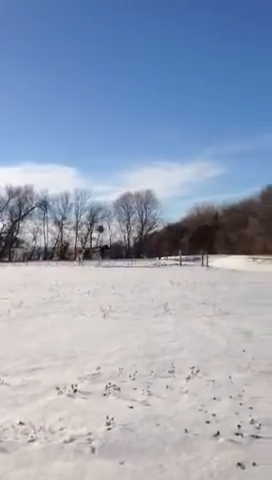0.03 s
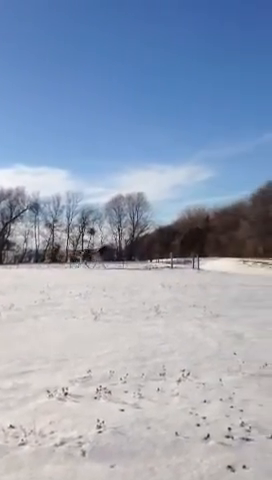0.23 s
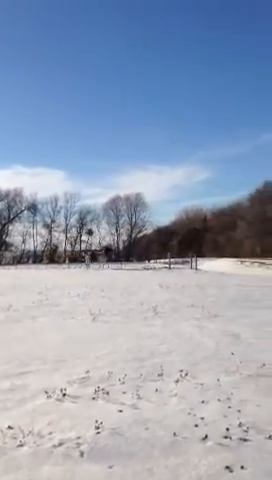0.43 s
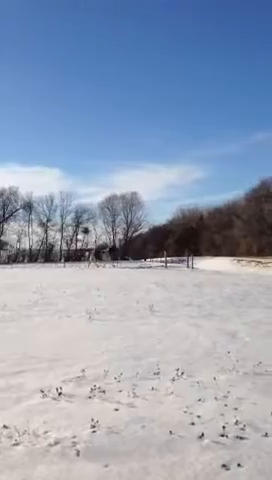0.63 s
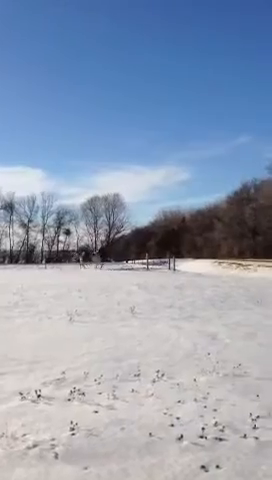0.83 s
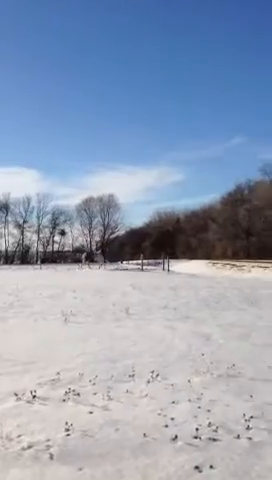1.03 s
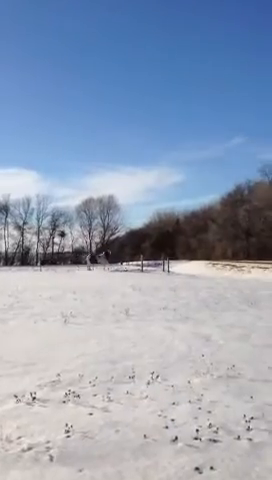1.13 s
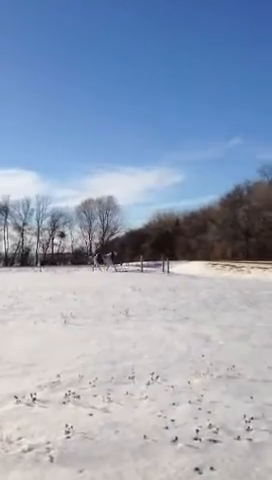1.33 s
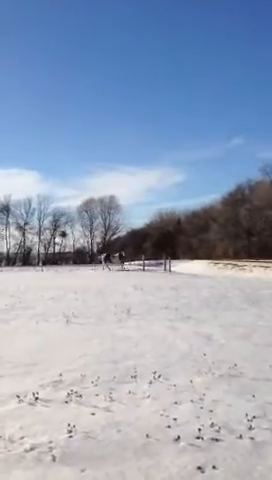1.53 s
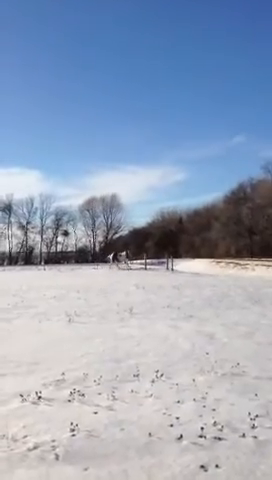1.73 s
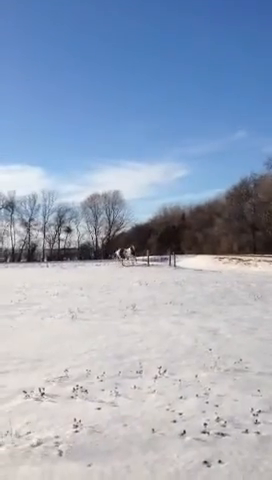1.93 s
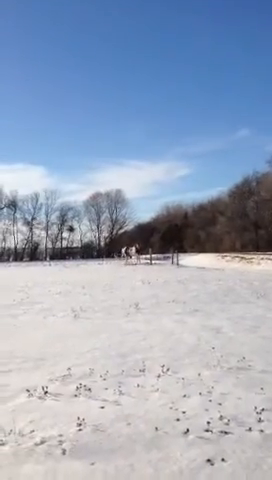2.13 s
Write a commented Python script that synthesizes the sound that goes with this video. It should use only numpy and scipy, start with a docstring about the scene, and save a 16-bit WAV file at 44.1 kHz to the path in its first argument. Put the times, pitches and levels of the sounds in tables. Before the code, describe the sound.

Single shrill horse whinny outdoors, held high then wobbling and dying away in a loose rattle

```python
"""Horse whinny over snow

A horse whinnies once: a low tone, and a high squeal that the low tone modulates into sidebands.
After a brief opening rattle the squeal holds, dips twice, wavers and breaks into a fading rattle.
Harmonic sums make both tones; shaped noise makes rush, rasp, breaks, flaps and air.
Trees return a faint echo through decaying random taps; a thud and a crunch of snow close the scene.
"""
import sys
import numpy as np
from scipy import signal
from scipy.fft import rfft, irfft
from scipy.io import wavfile

SR = 44100
rng = np.random.default_rng(int(sys.argv[2]) if len(sys.argv) > 2 else 0)


def pcm_store(signal):
    """Save signal as 16-bit PCM."""
    levels = np.round(np.clip(np.atleast_2d(signal), -1, 1) * 32767)
    wavfile.write(sys.argv[1], SR, levels.astype(np.int16).T)


N = 97020
T = np.arange(N) / SR
HZ = np.fft.rfftfreq(N, 1 / SR)


def amp(db):
    """Decibels to gain."""
    return 10 ** (np.asarray(db) / 20)


def unit(x):
    """Scales to rms 1."""
    return x / np.sqrt(np.mean(x ** 2) + 1e-20)


def curve(rows, axis=1):
    """One column of a timed table, interpolated at every sample and held beyond its ends."""
    rows = np.array(rows)
    return np.interp(T, rows[:, 0], rows[:, axis])


def level(rows, axis=1):
    """Gain from a dB curve, dying away exponentially outside it."""
    decay_s = 0.0088
    outside_s = np.maximum(rows[0][0] - T, 0) + np.maximum(T - rows[-1][0], 0)
    return amp(curve(rows, axis)) * np.exp(-outside_s / decay_s)


def colour(x, points):
    """Minimum-phase filter through (Hz, dB) points: causal, so clicks ring after they land."""
    hz, db = np.transpose(points)
    bin_hz = abs(np.fft.fftfreq(N, 1 / SR)) + 1
    log_gain = np.log(amp(np.interp(np.log(bin_hz), np.log(hz), db)))
    response = np.exp(signal.hilbert(log_gain).conj())[:len(HZ)]
    return irfft(rfft(x) * response, N)


def wander(rate_hz):
    """Smooth random curve of rms 1: noise under a Gaussian lowpass."""
    return unit(irfft(rfft(rng.standard_normal(N)) * np.exp(-(HZ / rate_hz) ** 2), N))


def phase(hz):
    """Running phase of a pitch curve [rad]."""
    return 2 * np.pi * np.cumsum(hz) / SR


def random_phase():
    """Random starting phase [rad]."""
    return 2 * np.pi * rng.random()


# pitch of the squeal and of the low voice: (time [s], pitch [Hz])
SQUEAL_PITCH_HZ = [(.2, 1490), (.22, 1630), (.284, 1783), (.34, 1858), (.455, 1890), (.482, 1712),
                   (.51, 1696), (.524, 1877), (.66, 1897), (.82, 1800), (.836, 1678), (.89, 1648),
                   (.934, 1700), (.948, 1820), (.975, 1790), (.99, 1715), (1.035, 1717), (1.06, 1821),
                   (1.11, 1739), (1.146, 1785), (1.22, 1557), (1.272, 1667), (1.3, 1613), (1.365, 1660),
                   (1.41, 1560)]
LOW_PITCH_HZ = [(.24, 401.3), (.274, 476.4), (.345, 511.2), (.48, 540), (.664, 504.4), (.73, 519.8),
                (.95, 509.4), (1.09, 443.6), (1.205, 421.2), (1.262, 481.4), (1.31, 420)]
# squeal's unsteadiness: (time [s], rms deviation [share of pitch])
JITTER_SHARE = [(.2, 0.035), (.33, 0.0039), (.66, 0.0051), (.8, 0.004), (1.29, .011), (1.36, 0.049)]
SQUEAL_JITTER_HZ, LOW_JITTER_HZ = 236, 95.5
LOW_JITTER_RATIO = 1.618  # low voice's unsteadiness relative to the squeal's


def voice_phases():
    """Phases of the two voices, each pitch unsteady by its own random wander."""
    jitter = curve(JITTER_SHARE)
    low_jitter = LOW_JITTER_RATIO * jitter * wander(LOW_JITTER_HZ)
    high_jitter = jitter * wander(SQUEAL_JITTER_HZ)
    low = phase(curve(LOW_PITCH_HZ) * (1 + low_jitter))
    high = phase(curve(SQUEAL_PITCH_HZ) * (1 + high_jitter))
    return low, high


# squeal's fundamental, then its overtones: (time [s], level [dB])
SQUEAL_LEVEL_DB = [(.205, -42), (.28, -34), (.46, -35), (.545, -33.5), (.66, -37.5), (.87, -37),
                   (1.01, -32.5), (1.1, -34.5), (1.175, -29), (1.215, -32.5), (1.275, -27.5),
                   (1.302, -32.5), (1.32, -48), (1.383, -30.5), (1.41, -40.5)]
OVERTONE_LEVEL_DB = [(.2, -64), (.25, -44.5), (.36, -44), (.54, -37.5), (.72, -39), (.8, -34.5),
                     (.975, -34.5), (1.0, -45), (1.065, -39.5), (1.1, -58.5), (1.27, -42.5)]
# depth of the sidebands round the fundamental: (time [s], level [dB])
COUPLING_DB = [(.2, -18), (.29, -3), (.45, -5), (.66, -3), (.78, -5.5), (.95, -12.5), (1.02, -9.5),
               (1.08, -29), (1.3, -19), (1.4, -16)]
# one row per squeal harmonic: relative level [dB] at offsets of -3 .. +3 times the low pitch
SIDEBANDS_DB = [(-43, -57, -19.5, 2.5, 0, -4, -4), (-15, -10, -15, 2.5, -3, -16.5, -16),
                (-7.5, -17, -35, -14, -17, -38, -25)]
FLICKER_DB, FLICKER_HZ = 3.5, 32.5  # rms, sidebands; halved elsewhere
OVERTONE_COUPLING_POWER = 0.23


def squeal(low, high):
    """The high tone; each harmonic carries flickering sidebands spaced by the low pitch."""
    first, upper = level(SQUEAL_LEVEL_DB), level(OVERTONE_LEVEL_DB)
    depth = amp(curve(COUPLING_DB))
    out = np.zeros(N)
    for m, row in enumerate(SIDEBANDS_DB, 1):
        carrier = first if m == 1 else upper
        sideband = carrier * (depth if m == 1 else depth ** OVERTONE_COUPLING_POWER)
        for k, db in enumerate(row, -3):
            gain = sideband if k else carrier
            flicker_db = FLICKER_DB * wander(FLICKER_HZ) * (1 if k else .5)
            out += gain * amp(db + flicker_db) * np.cos(m * high + k * low + random_phase())
    return np.sqrt(2) * out


# low voice: (time [s], level [dB])
LOW_LEVEL_DB = [(.19, -68), (.27, -48), (.87, -51.5), (1.1, -45), (1.28, -48.5), (1.32, -64)]
# relative level of each harmonic from the first up [dB]
LOW_HARMONICS_DB = [2.5, 4, -17.5, -2, -64, 2, 1.5]
# extra on all harmonics above the first, then on the third alone: (time [s], level [dB])
LOW_BRIGHT_DB = [(.27, -9.5), (.4, 2.5), (.85, 2.5), (1.08, -11), (1.3, 0)]
THIRD_SWELL_DB = [(1.0, 12), (1.18, 28), (1.25, 10.5)]


def low_voice(low):
    """The lower tone: a harmonic sum whose partials flicker independently."""
    bright = amp(curve(LOW_BRIGHT_DB))
    tone = np.zeros(N)
    for k, db in enumerate(LOW_HARMONICS_DB, 1):
        gain = bright if k > 1 else 1
        if k == 3:
            gain = gain * amp(curve(THIRD_SWELL_DB))
        flicker_db = FLICKER_DB / 2 * wander(FLICKER_HZ)
        tone += gain * amp(db + flicker_db) * np.cos(k * low)
    return np.sqrt(2) * level(LOW_LEVEL_DB) * tone


# colour of both tones: (frequency [Hz], gain [dB])
THROAT_DB = [(3600, -4), (5000, -3), (5450, -16.5), (12000, -13)]


def throat(tones):
    """Filters the two tones by the throat's response."""
    return colour(tones, THROAT_DB)


# harsh patches: (start [s], end [s], centre [Hz], level [dB])
BREAKS = [(0.254, 0.315, 3494, -45), (0.473, 0.528, 4200, -46.5), (0.821, 0.943, 4410, -49),
          (0.988, 1.04, 4380, -40.5), (1.063, 1.107, 6400, -57)]
BREAK_WIDTH_HZ = 400


def breaks(low):
    """The squeal cracks into a harsh noise band, chopped by each cycle of the low voice."""
    out = np.zeros(N)
    for start_s, end_s, centre_hz, db in BREAKS:
        band = wander(BREAK_WIDTH_HZ) * np.cos(2 * np.pi * centre_hz * T)
        chopped = unit(band * (1 + np.cos(low)))
        out += level([(start_s, db), (end_s, db)]) * chopped
    return out


# treble rasp: (time [s], level [dB])
RASP_LEVEL_DB = [(.19, -63.5), (.27, -50), (.55, -47), (.9, -45.5), (1.085, -46.5), (1.3, -53)]
# its colour: (frequency [Hz], relative density [dB per Hz])
RASP_COLOUR_DB = [(2300, -26), (3400, 5.5), (4350, 2.5), (5200, -11.5), (7100, -14), (8500, -17),
                  (12000, -32.5)]
RASP_WIDTH_HZ = 28


def rasp(low, high):
    """Fluttering combination tones of the two voices, giving way to hiss at the top."""
    clash = np.zeros(N)
    for m in range(1, 6):
        for k in range(-3, 4):
            clash += wander(RASP_WIDTH_HZ) * np.cos(m * high + k * low + random_phase())
    hiss = np.diff(np.diff(rng.standard_normal(N + 2)))  # differenced twice: rises with frequency
    return level(RASP_LEVEL_DB) * unit(colour(unit(clash) + hiss, RASP_COLOUR_DB))


# air through the voice: (time [s], level [dB])
RUSH_LEVEL_DB = [(.2, -49.5), (.28, -43), (.4, -52), (.66, -43.5), (.85, -58.5), (1.05, -45.5), (1.18, -41),
                 (1.31, -47)]
# its colour: (frequency [Hz], relative density [dB per Hz])
RUSH_COLOUR_DB = [(100, -40.5), (1200, -4.5), (1800, 12), (2400, 2.5), (8000, -76)]
RUSH_PULSING = 0.17  # modulation depth


def rush(low):
    """Air noise, puffing with each cycle of the low voice."""
    puffs = (1 + RUSH_PULSING * np.cos(low)) * rng.standard_normal(N)
    return level(RUSH_LEVEL_DB) * unit(colour(puffs, RUSH_COLOUR_DB))


# opening and closing rattles: (time [s], chest level [dB], mouth level [dB], nostril level [dB])
RATTLES_DB = [
    [(.147, -59.5, -61.5, -71), (.19, -54, -49.5, -51), (.24, -59, -52, -52)],
    [(1.305, -53.5, -41.5, -48), (1.41, -49.5, -45, -48.5), (1.51, -54.5, -45, -54.5),
     (1.55, -52.5, -49.5, -54), (1.63, -51, -53, -62), (1.66, -55, -56, -54), (1.695, -61, -55.5, -57)],
]
# flapping speed: (time [s], rate [flaps per s])
FLAP_RATE_HZ = [(1.5, 161), (1.54, 98), (1.64, 93), (1.7, 63)]
# brief spurts of mouth and nostrils: (time [s], extra level [dB])
SPURTS_DB = [(1.481, 4), (1.648, 5.5)]
# cavities: (frequency [Hz], relative density [dB per Hz])
CHEST_DB = [(80, -26), (400, -2.5), (560, -0.5), (1400, -33)]
MOUTH_DB = [(200, -43), (950, -2), (1700, 1), (2400, -5.5), (4000, -43)]
NOSTRILS_DB = [(1700, -34), (3300, 5.5), (5300, -18.5), (14000, -36)]
FLAP_DECAY_CYCLES, FLAP_FLOOR, FLAP_CLICK = .33, .3, .2  # puff decay, steady air, click share
FLAP_WANDER, FLAP_WANDER_HZ = .15, 90  # rms of log rate, and its speed
FLAP_SPREAD_DB, SPURT_S = 1.5, .003


def rattle():
    """Slack, uneven flaps: each a click and a decaying puff, sounding chest, mouth and nostrils."""
    rate_hz = curve(FLAP_RATE_HZ) * np.exp(FLAP_WANDER * wander(FLAP_WANDER_HZ))
    turns = np.cumsum(rate_hz) / SR
    clicks = unit(np.diff(np.floor(turns), prepend=0))
    puff_shape = FLAP_FLOOR + np.exp(-(turns % 1) / FLAP_DECAY_CYCLES)
    spurts = amp(sum(db * np.exp(-((T - at_s) / SPURT_S) ** 2) for at_s, db in SPURTS_DB))
    cavities = [(CHEST_DB, 1), (MOUTH_DB, spurts), (NOSTRILS_DB, spurts)]
    out = np.zeros(N)
    for column, (cavity, push) in enumerate(cavities, 1):
        size = amp(FLAP_SPREAD_DB * rng.standard_normal(N))[turns.astype(int)]  # one draw per flap
        puffs = unit(puff_shape * rng.standard_normal(N))
        effort = push * sum(level(rows, axis=column) for rows in RATTLES_DB)
        out += effort * unit(colour(size * (puffs + FLAP_CLICK * clicks), cavity))
    return out


NOTCH_HZ, NOTCH_HALF_WIDTH_HZ, NOTCH_DB = 2665, 155, -38


def notch(x):
    """Hollows out one narrow, flat-bottomed band of the whole call."""
    offset = (HZ - NOTCH_HZ) / NOTCH_HALF_WIDTH_HZ
    return irfft(rfft(x) * amp(NOTCH_DB * np.exp(-offset ** 4)), N)


def whinny():
    """Both tones through the throat, plus the noises; one band hollowed from all."""
    low, high = voice_phases()
    tones = throat(low_voice(low) + squeal(low, high))
    noises = rush(low) + rasp(low, high) + breaks(low) + rattle()
    return notch(tones + noises)


# thud: (time [s], pitch [Hz], length [s], level [dB])
THUD = (2.132, 120, .009, -56)
# snow's crunch: (time [s], level [dB])
CRUNCH_LEVEL_DB = [(2.13, -79), (2.19, -60.5)]
# its colour: (frequency [Hz], relative density [dB per Hz])
CRUNCH_COLOUR_DB = [(700, -13), (950, 0), (1600, -29), (4500, -5), (8000, -45)]


def step():
    """A soft thud (sine in a Gaussian envelope), then grainy noise for a little crunch of snow."""
    at_s, hz, length_s, db = THUD
    envelope = amp(db) * np.exp(-((T - at_s) / length_s) ** 2)
    thud = envelope * np.sin(2 * np.pi * hz * (T - at_s))
    grains = rng.standard_normal(N) * amp(2.5 * wander(190))
    return thud + level(CRUNCH_LEVEL_DB) * unit(colour(grains, CRUNCH_COLOUR_DB))


ECHO_DB, ECHO_T60_S, ECHO_DELAY_S, ECHO_TAPS_PER_S = -18.5, 1.05, .03, 2000


def trees(x):
    """Faint scattered echo from the edge of the wood: sparse random taps, decaying."""
    present = (rng.random(N) < ECHO_TAPS_PER_S / SR) * (T > ECHO_DELAY_S)
    decay = np.exp(-np.log(1000) * T / ECHO_T60_S)
    taps = rng.standard_normal(N) * present * decay
    return amp(ECHO_DB) * signal.fftconvolve(x, taps / np.linalg.norm(taps))[:N]


# outdoor air: (frequency [Hz], relative density [dB per Hz])
AIR_COLOUR_DB = [(60, -39), (135, -1.5), (330, -4.5), (1000, -20), (3000, -18), (15000, -24.5)]
AIR_DB = -63.5


def air():
    """Quiet outdoor rumble and hiss: steady coloured noise."""
    return amp(AIR_DB) * unit(colour(rng.standard_normal(N), AIR_COLOUR_DB))


def scene():
    """The horse, its echo, the air and the step, in mono."""
    horse = whinny()
    return (horse + trees(horse) + air() + step())[None]


LOW_CUT_HZ, EDGE_HZ = 70, 15350


def record(dry):
    """Low cut and band limit."""
    low_cut = signal.butter(2, LOW_CUT_HZ, "high", fs=SR, output="sos")
    thin = signal.sosfilt(low_cut, dry)
    band_limit = signal.firwin(601, EDGE_HZ, window=("kaiser", 9), fs=SR)
    return signal.oaconvolve(thin, band_limit[None], "same")


dry = scene()
out = record(dry)
pcm_store(out)
```